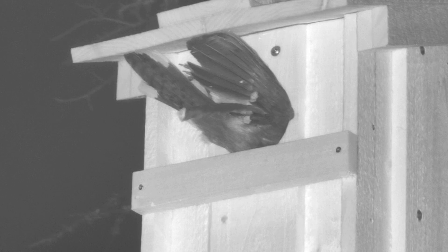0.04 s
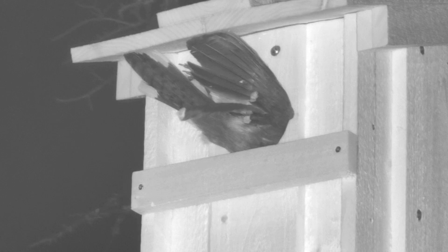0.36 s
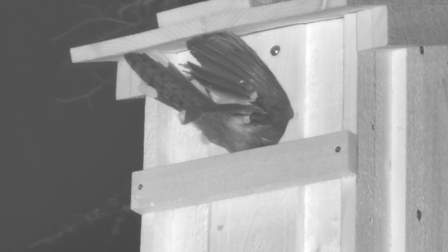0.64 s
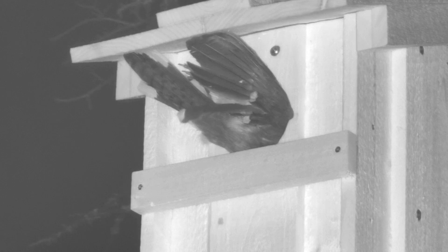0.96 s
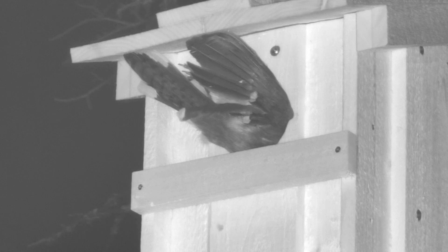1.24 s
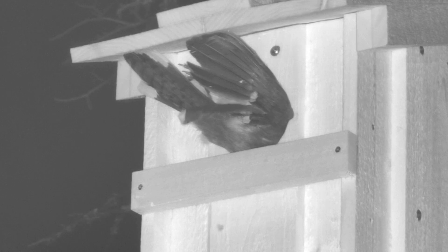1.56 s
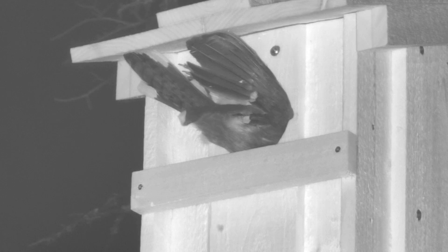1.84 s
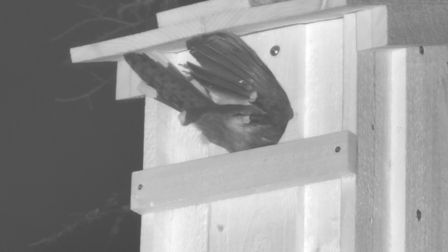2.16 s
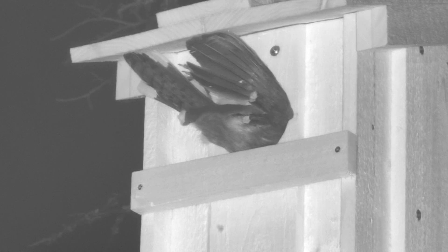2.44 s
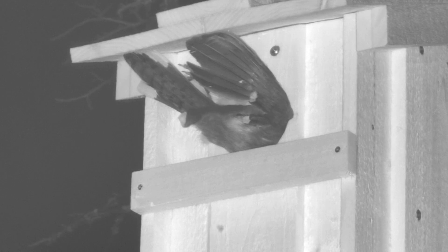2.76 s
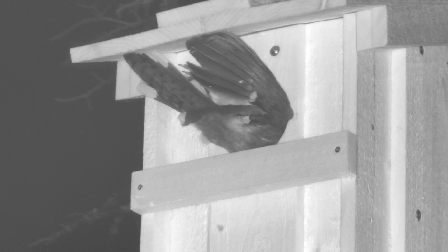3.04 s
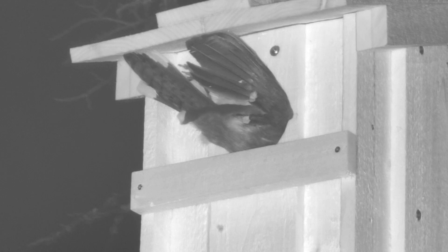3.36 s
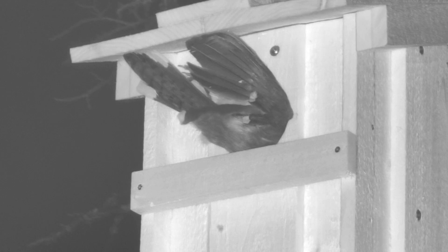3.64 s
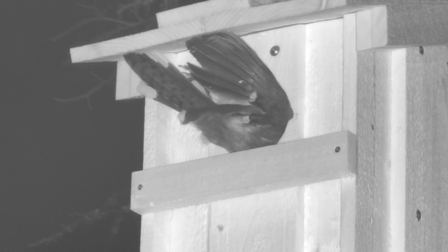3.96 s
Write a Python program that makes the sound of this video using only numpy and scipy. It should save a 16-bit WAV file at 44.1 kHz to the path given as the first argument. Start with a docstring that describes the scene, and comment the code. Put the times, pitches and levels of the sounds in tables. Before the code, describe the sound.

Soft, low wind buffeting over hiss and thin far-off chirping, as a bird's claw ticks once.

```python
"""A quiet night beside a wooden nest box, at the microphone of a small outdoor camera.
From the start, light wind buffets the microphone over a far rumble and hiss; distant chirps,
perhaps frogs, flicker as a thin ringing near 3.5 kHz. At 1.4 s a bird clinging to the box makes
one sharp claw tick. From 3.3 s its feathers brush the wood three times, faintly.
Just before the end something peeps far off."""
import sys
import numpy as np
from scipy import signal
from scipy.fft import rfft, irfft
from scipy.io import wavfile
from scipy.ndimage import uniform_filter1d

SR = 44100
rng = np.random.default_rng(int(sys.argv[2]) if len(sys.argv) > 2 else 0)


def waveform_to_disk(signal):
    """Save audio, clipped to [-1, 1], as 16-bit WAV at the path in sys.argv[1]."""
    frames = np.transpose(np.atleast_2d(signal))
    scaled = np.clip(frames, -1, 1) * 32767
    samples = np.round(scaled).astype(np.int16)
    wavfile.write(sys.argv[1], SR, samples)


N = 4 * SR


def amp(db):
    """Decibels to gain."""
    return 10 ** (np.asarray(db) / 20)


def unit_rms(x):
    """Scales to an rms of one."""
    return x / np.sqrt(np.mean(x ** 2) + 1e-20)


def spectrum_at(points, hz):
    """Interpolates a spectrum on a log-frequency axis."""
    point_hz, db = np.transpose(points)
    return np.interp(np.log(hz + 1), np.log(point_hz), db)


def curve(points):
    """Interpolates a time curve at every sample."""
    return np.interp(np.arange(N) / SR, *np.transpose(points))


def drift(scale_s):
    """Smooth random motion, unit rms."""
    window = signal.windows.hann(int(2 * scale_s * SR) + 3)
    return unit_rms(signal.fftconvolve(rng.standard_normal(N), window, "same"))


def noise(colour):
    """Steady coloured noise, unit rms."""
    gain = amp(spectrum_at(colour, np.fft.rfftfreq(N, 1 / SR)))
    return unit_rms(irfft(rfft(rng.standard_normal(N)) * gain, N))


def patchy_noise(colour, spread_db, frames, bins):
    """Coloured noise, unit rms; the level drifts in time-frequency patches."""
    hz = np.fft.rfftfreq(1024, 1 / SR)
    real, imag, patches = rng.standard_normal((3, N // 256 + 5, len(hz)))
    patches = uniform_filter1d(patches, frames, axis=0)
    patches = unit_rms(uniform_filter1d(patches, bins, axis=1))
    spectra = (real + 1j * imag) * amp(spectrum_at(colour, hz) + spread_db * patches)
    return unit_rms(signal.istft(spectra.T, nperseg=1024, noverlap=768)[1][:N])


# Gusts: (time [s], relative level [dB])
WIND_LEVEL = [(0, -36.5), (.1, -45), (.3, -41.5), (.42, -45.5), (.62, -47.5), (.76, -42), (.85, -37.5),
              (1.0, -39.5), (1.2, -45), (1.3, -39), (1.55, -40.5), (1.66, -42), (1.78, -39.5), (2.0, -43),
              (2.2, -42.5), (2.32, -35.5), (2.5, -49.5), (3.35, -53), (3.5, -47), (4, -48.5)]
# Eddy spectrum: (frequency [Hz], relative density [dB])
WIND_COLOUR = [(6, 5), (18, 4), (35, 2.5), (52, -4.5), (70, -6), (90, -10), (130, -15), (190, -26.5),
               (300, -33.5), (700, -47.5), (2000, -98)]


def wind(lump_s=0.068, gain_db=2.5):
    """Low eddies push on the microphone, rising and falling with the gusts."""
    eddies = noise(WIND_COLOUR)
    power = signal.fftconvolve(eddies ** 2, signal.windows.hann(int(lump_s * SR) + 3), "same")
    eddies = unit_rms(eddies / (abs(power) + 1e-9) ** 0.25)  # 2:1 compression
    return eddies * amp(curve(WIND_LEVEL) + gain_db)


# Night air: (frequency [Hz], relative density [dB])
RUMBLE_COLOUR = [(15, -1.5), (60, -0.5), (125, 1.5), (180, -5), (250, -6.5), (330, -9.5), (500, -13),
                 (800, -19), (1400, -26.5), (3000, -40.5), (8000, -69)]
# Low-band swell: (time [s], gain [dB])
RUMBLE_SWELL = [(0, -2.5), (.6, -3), (.85, 2), (1.15, -0.5), (1.28, 2), (1.37, 7.5), (1.5, -3), (1.9, -3.5),
                (2.25, 4), (2.42, -7), (2.5, 6), (2.58, -2), (3.17, 1), (3.26, 4), (3.36, -0.5), (3.8, -1),
                (3.95, 0)]


def rumble(base_db=-50, crossover_hz=400):
    """Far, dull wash of night air; the low band swells."""
    wash = patchy_noise(RUMBLE_COLOUR, spread_db=2.28, frames=12, bins=4)
    low = signal.sosfiltfilt(signal.butter(2, crossover_hz, fs=SR, output="sos"), wash)
    return amp(base_db) * (wash - low + low * amp(curve(RUMBLE_SWELL)))


# Noise floor: (frequency [Hz], relative density [dB])
HISS_COLOUR = [(100, -4), (1000, -4.5), (2000, -5.5), (2750, -5), (3150, 0.5), (3600, 0.5), (4150, -5.5),
               (4700, -12), (5400, -18.5), (6300, -26), (7300, -28.5), (8300, -42.5)]


def hiss(level_db=-57):
    """Even camera hiss, strongest at 3-4 kHz."""
    return amp(level_db) * patchy_noise(HISS_COLOUR, spread_db=1.0, frames=14, bins=12)


# Narrow bands of the ringing: (centre [Hz], width [Hz], relative level [dB])
RINGING_BANDS = [(3334, 63, 1), (3480, 50, 1.5), (3550, 50, -1), (3710, 63, -9.5), (4105, 120, -11),
                 (3180, 20, -10.5), (2950, 33, -17)]
# Ringing envelope: (time [s], level [dB])
RINGING_LEVEL = [(0, -68), (.09, -61), (.12, -73), (.16, -56), (.26, -68), (1.33, -70.5), (1.42, -62.5),
                 (1.8, -60.5), (2.13, -60.5), (2.45, -60.5), (2.6, -64), (2.68, -60), (2.81, -63),
                 (2.88, -59.5), (2.97, -60.5), (3.7, -58), (3.75, -63), (3.81, -56.5), (3.87, -60.5),
                 (4, -59)]


def ringing(wander_hz=26.1, wander_s=0.04, flicker_db=4, flicker_s=0.028):
    """Distant chirps blur into close, fuzzy tones that waver and flicker separately."""
    out, hz = np.zeros(N), np.fft.fftfreq(N, 1 / SR)
    for centre_hz, width_hz, db in RINGING_BANDS:
        white = rng.standard_normal(N) + 1j * rng.standard_normal(N)
        fuzz = np.fft.ifft(white / (1 + (2 * hz / width_hz) ** 2))
        cycles = np.cumsum(centre_hz + wander_hz * drift(wander_s)) / SR
        tone = unit_rms((fuzz * np.exp(2j * np.pi * cycles)).real)
        out += tone * amp(db + flicker_db * np.tanh(2 * drift(flicker_s)))
    return amp(curve(RINGING_LEVEL)) * unit_rms(out)


# Single eddies: (peak time [s], length [s], centre [Hz], level [dB])
BUFFETS = [(0.071, 0.041, 42.2, -33.5), (0.166, 0.035, 71, -32), (0.817, 0.03, 63.6, -25),
           (0.852, 0.023, 55, -24), (0.877, 0.047, 53.6, -22.5), (1.01, 0.04, 57, -32.5),
           (1.286, 0.055, 64.4, -33.5), (1.39, 0.087, 42.7, -30), (1.495, 0.0368, 58.8, -31.5),
           (1.546, 0.052, 44.7, -31.5), (2.02, .04, 55.4, -34), (2.103, 0.07, 43.3, -27.5),
           (2.248, 0.042, 49.2, -21.5), (2.3, 0.054, 50, -30), (2.426, 0.056, 32.2, -33),
           (2.499, .03, 123, -42), (3.019, .06, 70.3, -43.5), (3.272, 0.0315, 131, -49)]


def buffets(pitch_sag=0.28):
    """Stronger eddies shove the microphone for a few swings that slow as they pass."""
    out = np.zeros(N)
    for peak_s, length_s, hz, db in BUFFETS:
        position = np.linspace(-0.5, 0.5, int(length_s * SR))
        cycles = np.cumsum(hz * (1 - pitch_sag * position)) / SR + rng.random()
        swell = np.cos(np.pi * position) ** 2
        add(out, peak_s - length_s / 2, amp(db) * swell * np.sin(2 * np.pi * cycles))
    return out


# Clearest calls: (peak time [s], pitch [Hz], level [dB])
CHIRPS = [(.16, 3540, -57.5), (1.498, 3563, -58), (1.776, 3340, -56.5), (1.829, 3520, -55),
          (1.916, 3482, -57), (1.991, 3516, -54), (2.136, 3550, -52), (2.2, 3574, -55),
          (2.366, 3550, -56.5), (2.429, 3350, -59), (2.525, 3340, -56), (2.766, 3558, -54),
          (2.882, 3343, -53.5), (2.9, 3563, -54), (3.381, 3590, -58), (3.689, 3500, -56.5),
          (3.82, 3520, -55)]


def chirps(length_s=0.065, waver_hz=18.6, waver_s=0.008):
    """Short, wavering calls, perhaps far-off frogs, stand out of the ringing."""
    out, detune_hz = np.zeros(N), waver_hz * drift(waver_s)
    swell = signal.windows.hann(int(length_s * SR))
    for peak_s, hz, db in CHIRPS:
        cycles = np.cumsum(hz + detune_hz[int(peak_s * SR):][:len(swell)]) / SR + rng.random()
        add(out, peak_s - length_s / 2, amp(db) * swell * np.sin(2 * np.pi * cycles))
    return out


# Claw on the box: (time [s], base level [dB])
TICKS = [(1.3632, -35)]
# Tick modes: (frequency [Hz], relative level [dB], t60 [s])
TICK_MODES = [(1723, -2, 0.039), (1920, -2, 0.031), (2260, -6, 0.045), (2520, -3, 0.044),
              (2970, -3.5, 0.045), (3360, 3.5, .036), (3840, -12, 0.03), (4320, -10, 0.036)]
# Onset scrape: (frequency [Hz], relative density [dB])
SCRAPE_COLOUR = [(900, -38), (1400, -19), (1700, -4), (3400, 5), (4300, -3), (5000, -46)]
# Soft returns of the ring: (delay [s], relative level [dB])
AFTER_RINGS = [(0.0113, -3), (.031, -11)]


def claw_tick(rise_s=0.00075, scrape_db=-21.5, scrape_s=0.013, after_hz=3380, after_rise_s=0.0036):
    """A claw scrapes and snaps on wood; a tone near its strongest mode returns softly twice."""
    out, t = np.zeros(N), np.arange(SR // 5) / SR
    attack = np.minimum(t / rise_s, 1)
    scrape_fade = np.clip(1 - (t / scrape_s) ** 2, 0, 1)
    after_swell = t / after_rise_s * np.exp(-(t / after_rise_s / 2) ** 2)
    after_ring = after_swell * np.sin(2 * np.pi * after_hz * t) / 2
    for start_s, db in TICKS:
        ring = sum(amp(mode_db - 60 * t / t60_s) * np.sin(2 * np.pi * (hz * t + rng.random()))
                   for hz, mode_db, t60_s in TICK_MODES)
        scrape = amp(scrape_db) * scrape_fade * noise(SCRAPE_COLOUR)[:len(t)]
        add(out, start_s, amp(db) * attack * (ring / 2 + scrape))
        for delay_s, after_db in AFTER_RINGS:
            add(out, start_s + delay_s, amp(db + after_db) * after_ring)
    return out


# Feather brushes: (start [s], length [s], centre [Hz], half-width at -12 dB [octaves], level [dB])
RUSTLES = [(3.287, 0.047, 3930, 0.15, -57), (3.555, 0.056, 2300, .2, -61.5),
           (3.786, 0.034, 2520, 0.95, -56.5)]


def feathers():
    """Feathers brush the wood as the bird shifts its grip."""
    out = np.zeros(N)
    for start_s, length_s, hz, octaves, db in RUSTLES:
        swell = signal.windows.hann(int(length_s * SR))
        colour = [(hz * 2 ** (octaves * step), -12 * step ** 2) for step in np.linspace(-3, 3, 13)]
        add(out, start_s, amp(db) * swell * noise(colour)[:len(swell)])
    return out


def peep(start_s=3.852, length_s=0.09, ramp_s=0.012, start_hz=2256, glide_hz_per_s=1000,
         base_db=-47, fade_db=-33):
    """A faint, distant pure note slides up as it fades."""
    out, t = np.zeros(N), np.arange(0, length_s, 1 / SR)
    gate = np.clip(np.minimum(t, length_s - t) / ramp_s, 0, 1)
    fade = amp(base_db + fade_db * t / length_s)
    cycles = np.cumsum(start_hz + glide_hz_per_s * t) / SR
    add(out, start_s, gate * fade * np.sin(2 * np.pi * cycles))
    return out


def add(mix, start_s, sound):
    """Mixes a sound in place, cut at the end of the mix."""
    part = mix[round(start_s * SR):][:len(sound)]
    part += sound[:len(part)]


def scene():
    """Mono sum of all sources."""
    background = wind() + rumble() + hiss() + ringing()
    return (background + buffets() + chirps() + claw_tick() + feathers() + peep())[None]


def record(dry):
    """The camera's band limit."""
    cutoff_hz = 8500
    lowpass = signal.firwin(511, cutoff_hz, window=("kaiser", 9), fs=SR)
    return signal.oaconvolve(dry, lowpass[None], "same")


dry = scene()
out = record(dry)
waveform_to_disk(out)
```